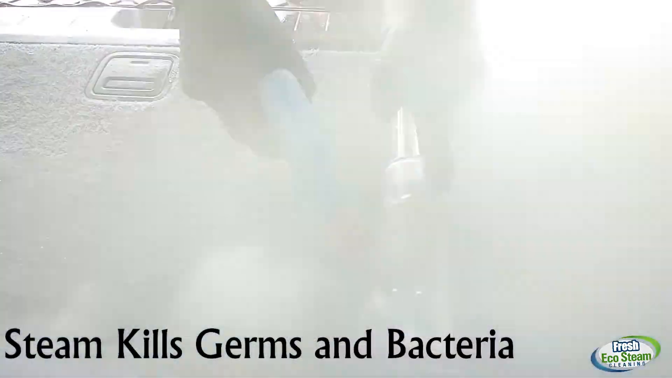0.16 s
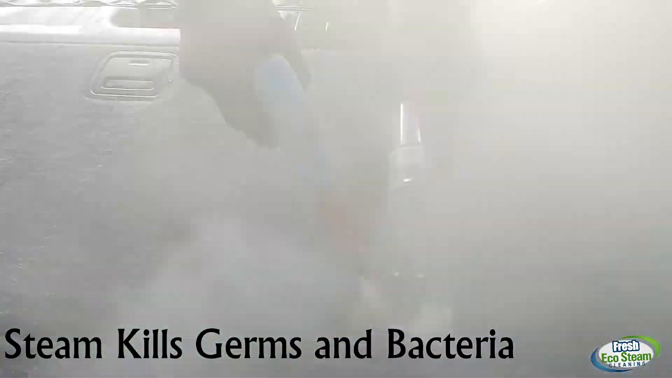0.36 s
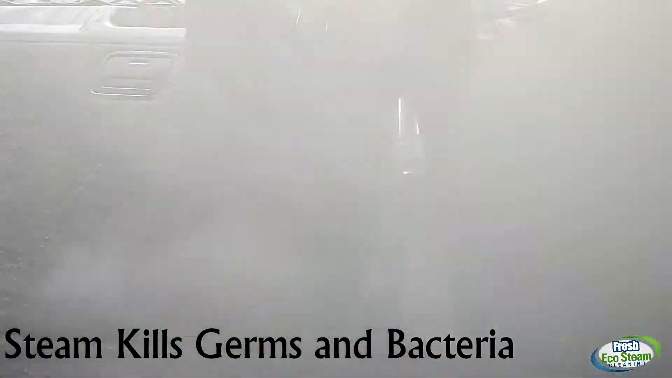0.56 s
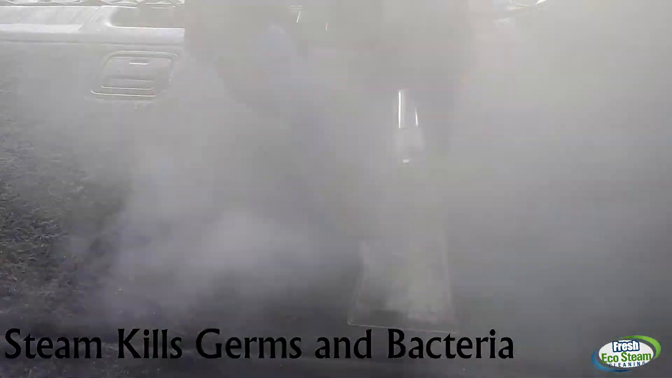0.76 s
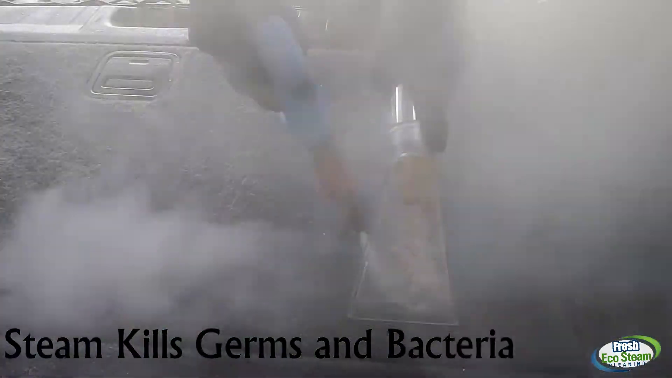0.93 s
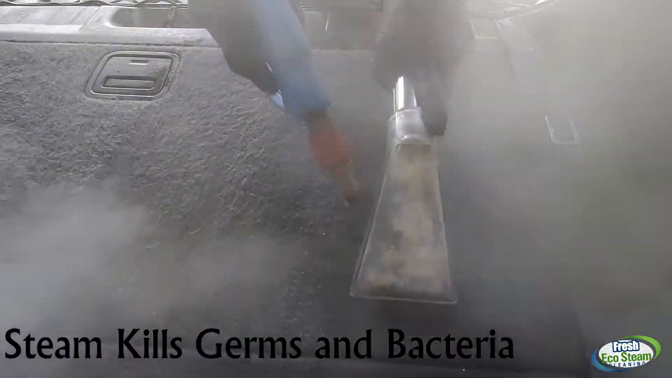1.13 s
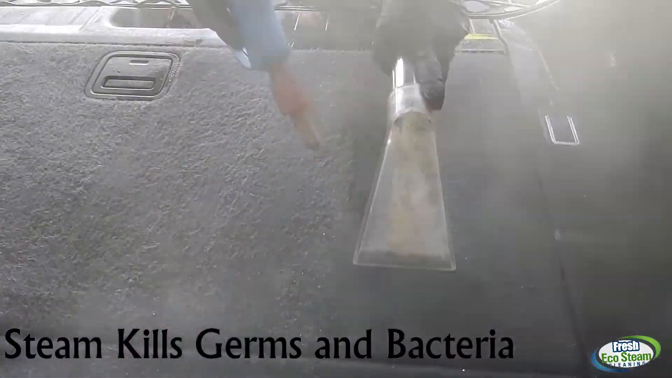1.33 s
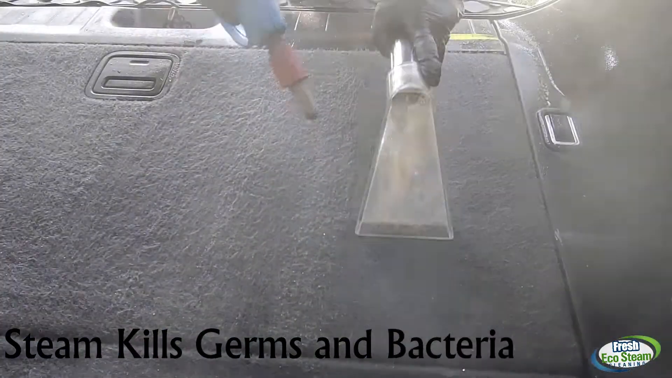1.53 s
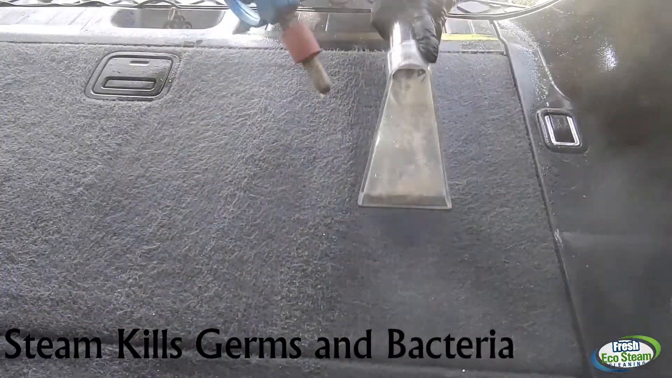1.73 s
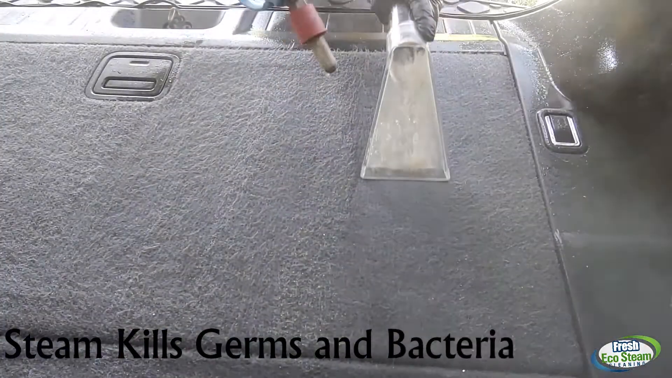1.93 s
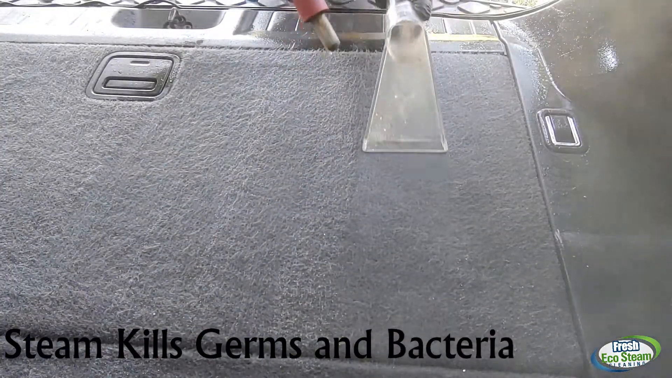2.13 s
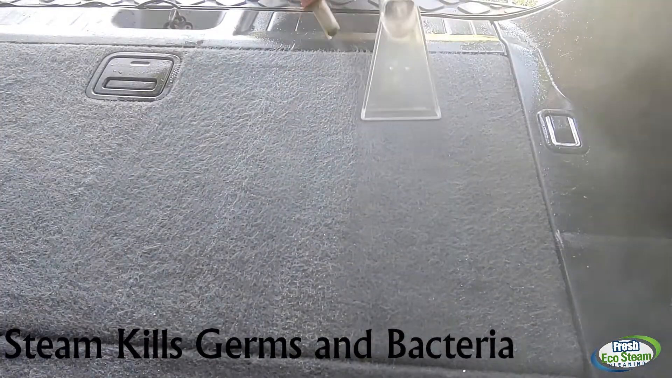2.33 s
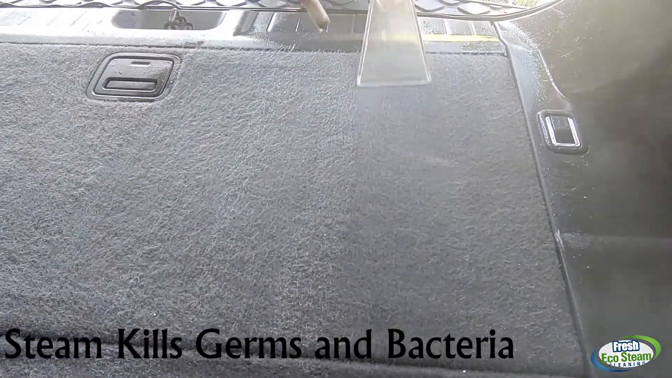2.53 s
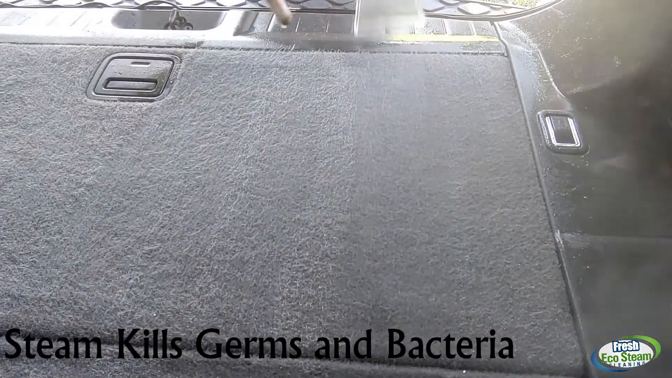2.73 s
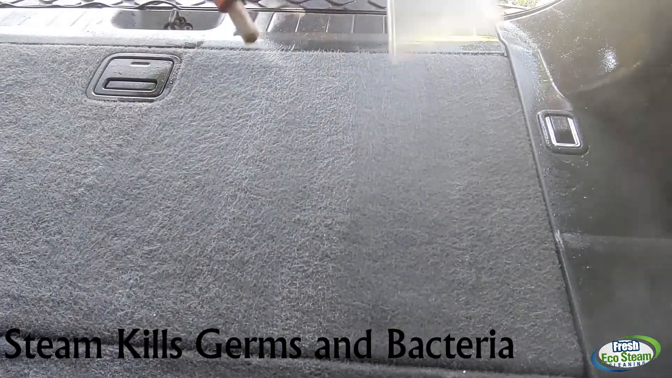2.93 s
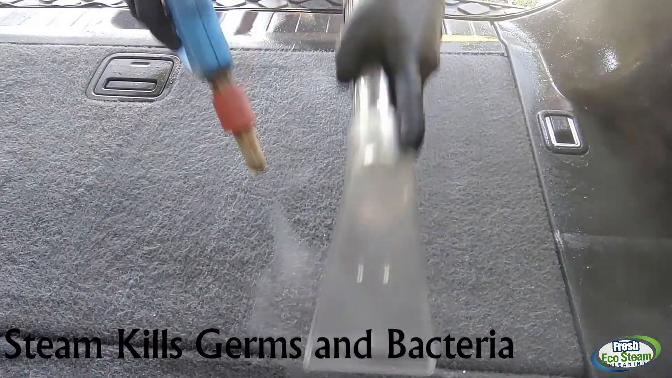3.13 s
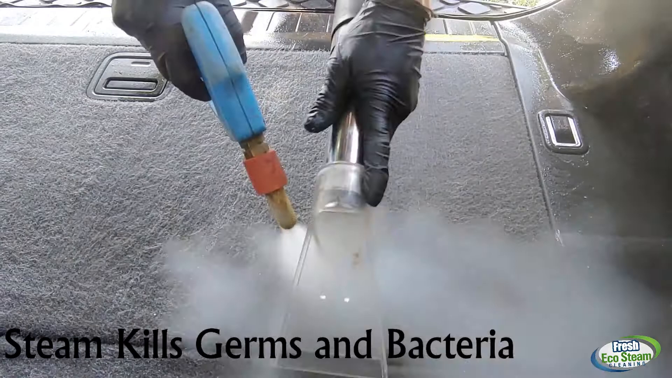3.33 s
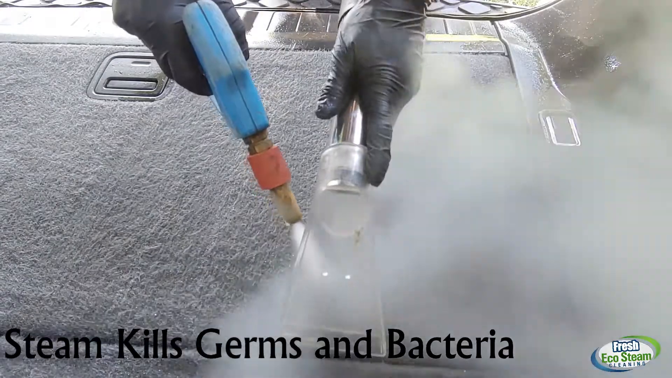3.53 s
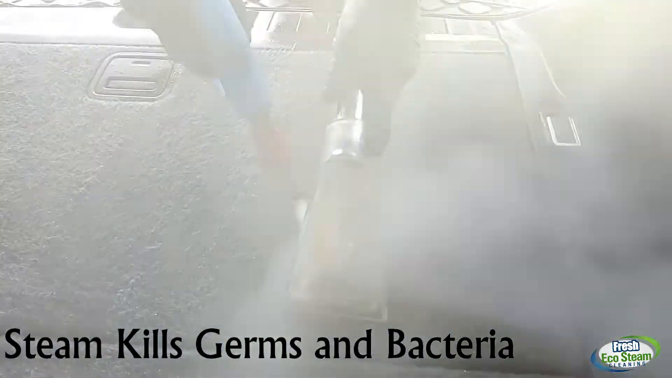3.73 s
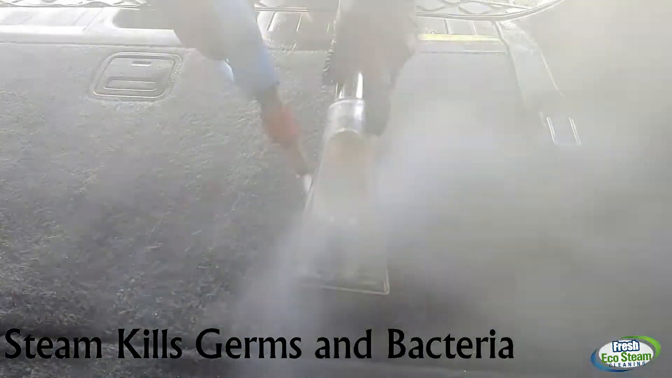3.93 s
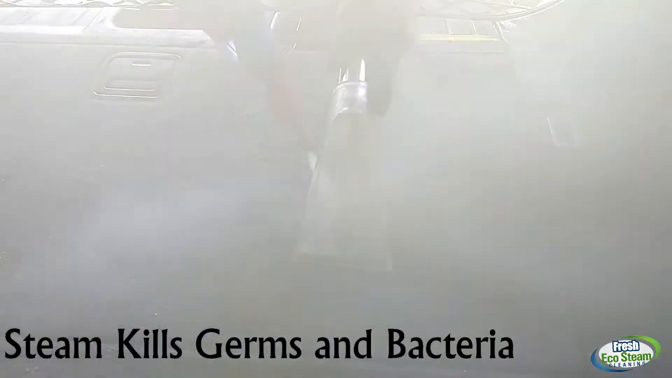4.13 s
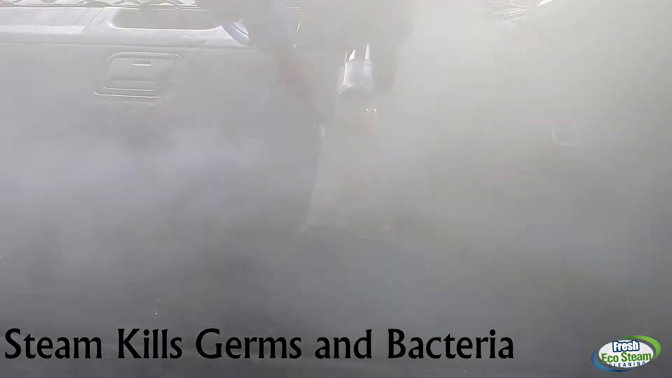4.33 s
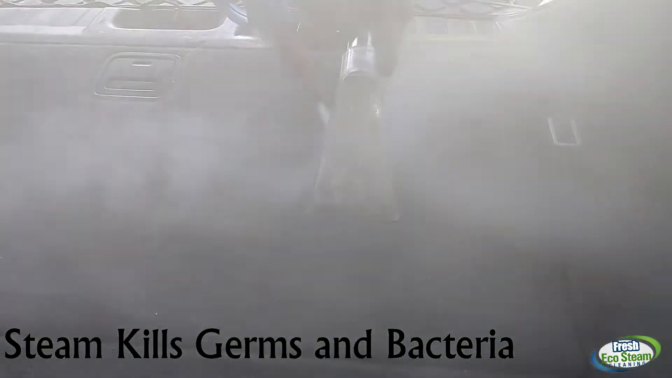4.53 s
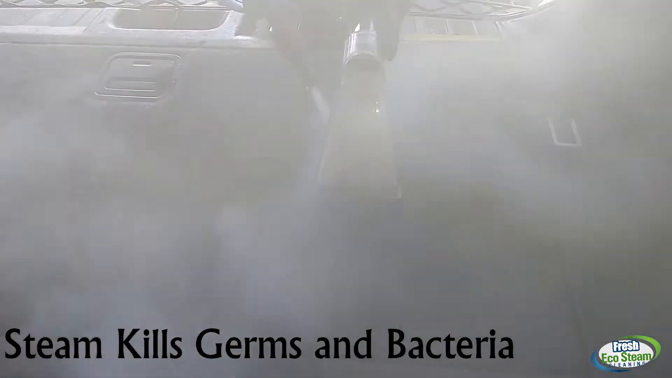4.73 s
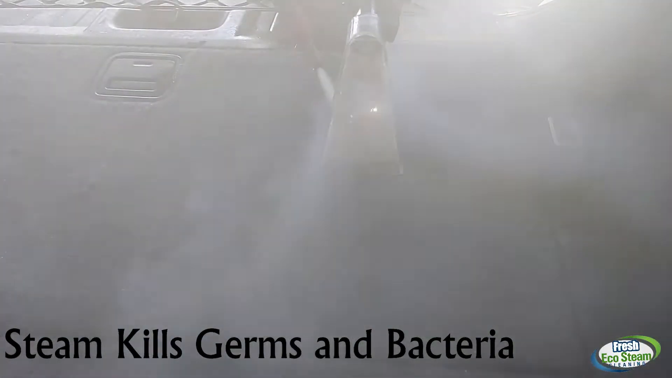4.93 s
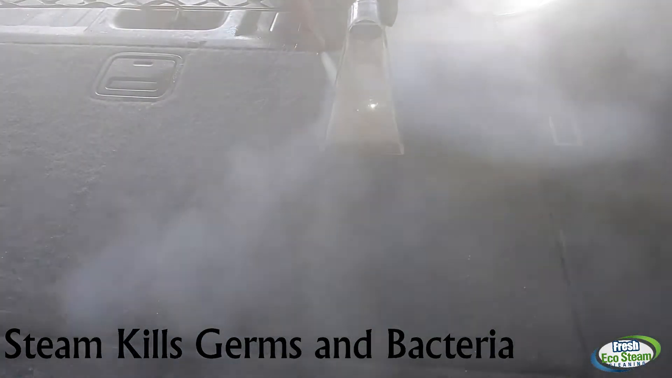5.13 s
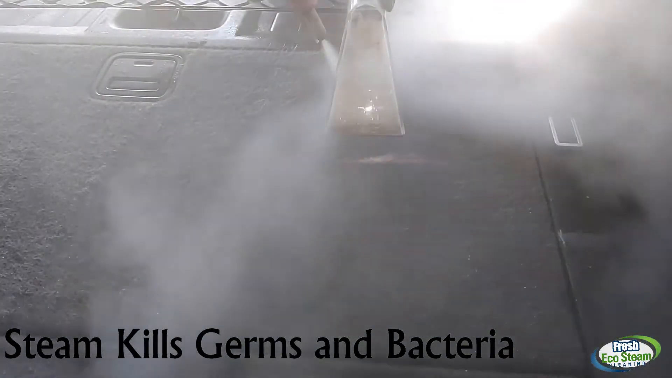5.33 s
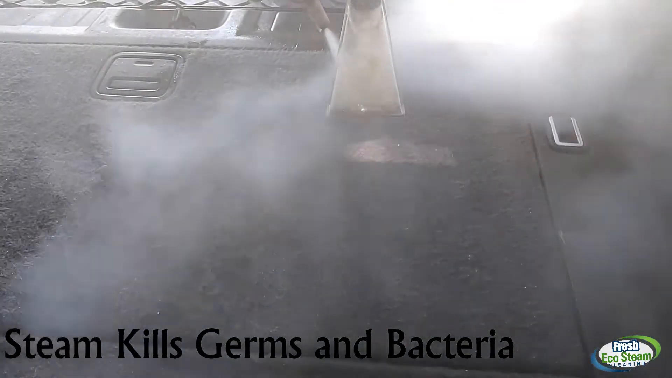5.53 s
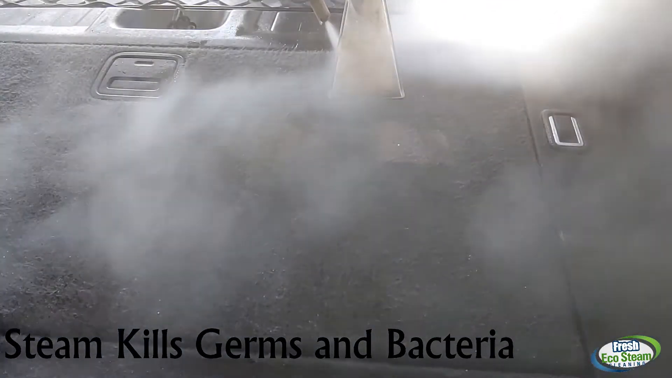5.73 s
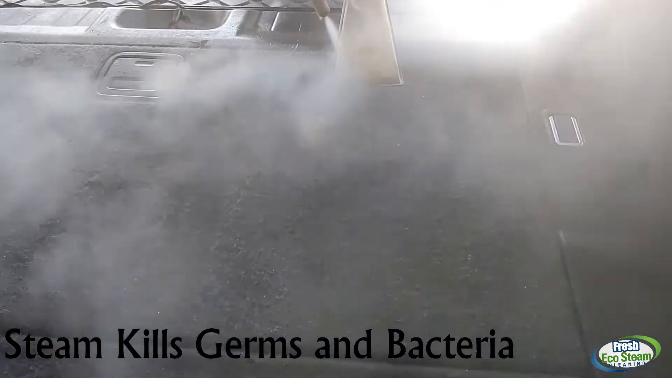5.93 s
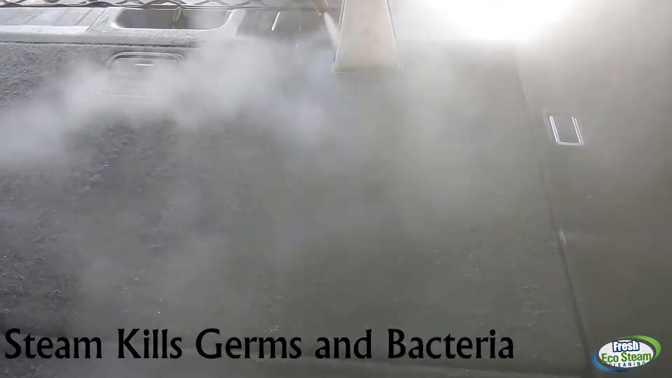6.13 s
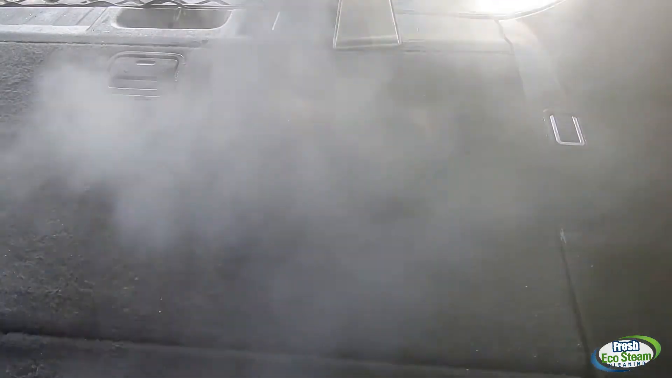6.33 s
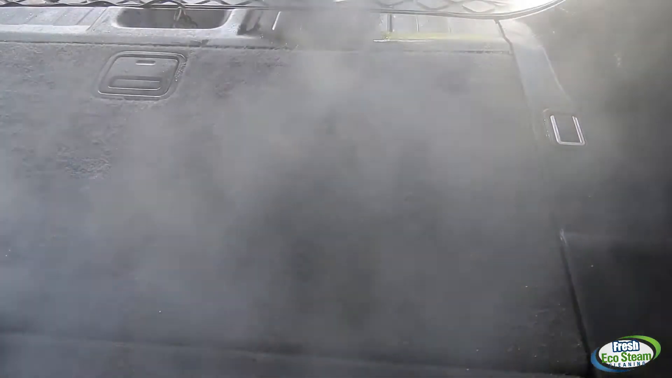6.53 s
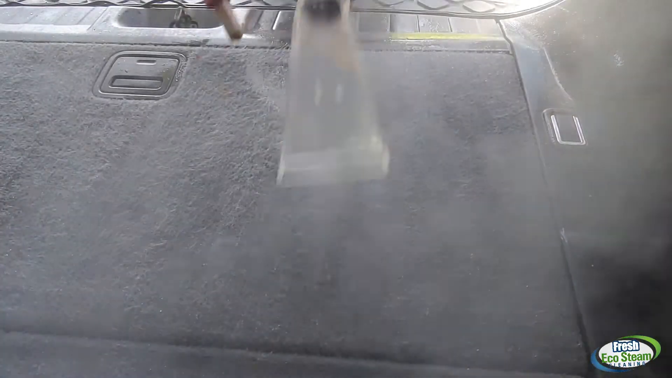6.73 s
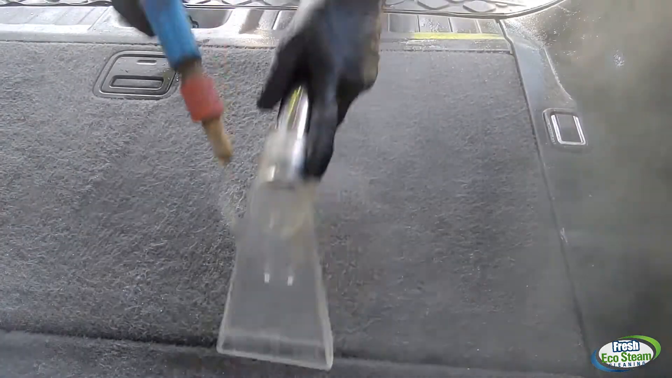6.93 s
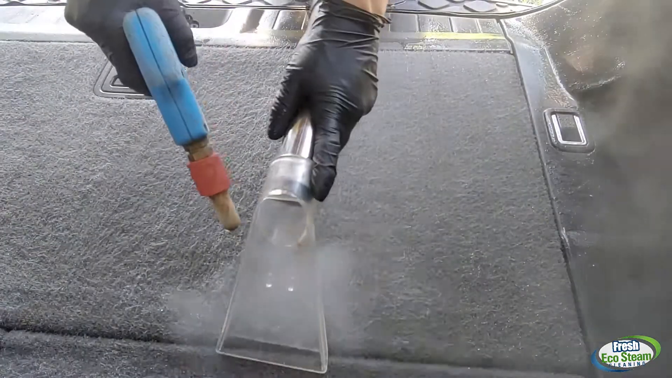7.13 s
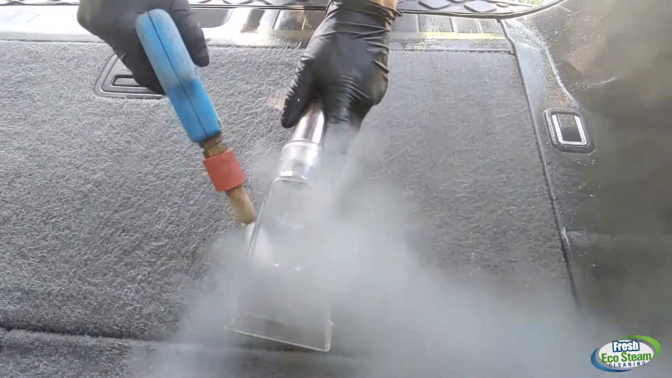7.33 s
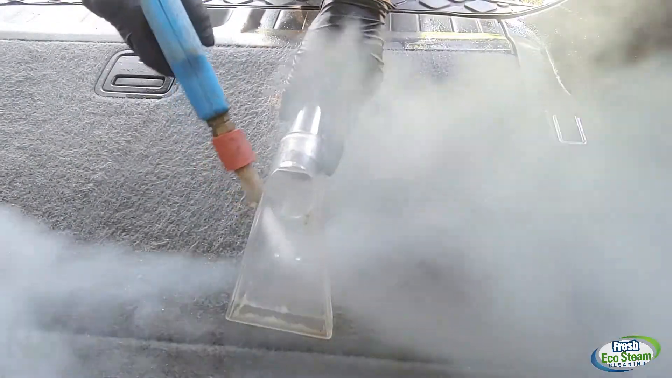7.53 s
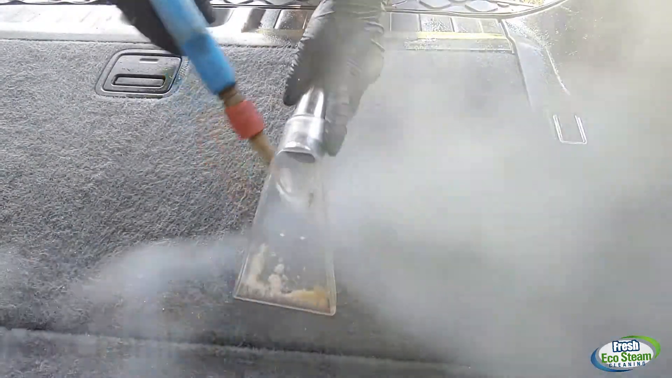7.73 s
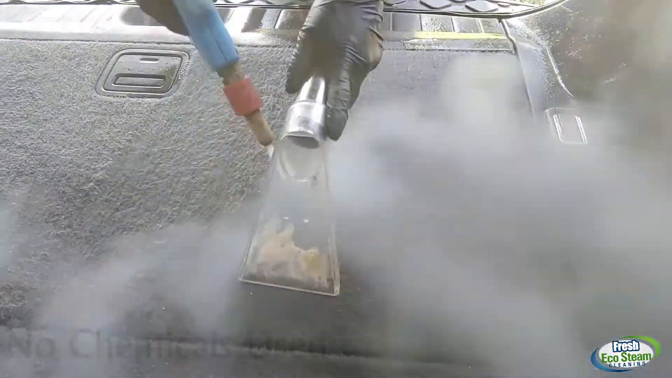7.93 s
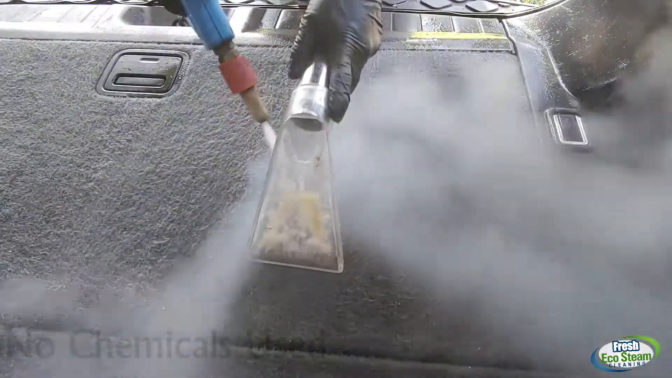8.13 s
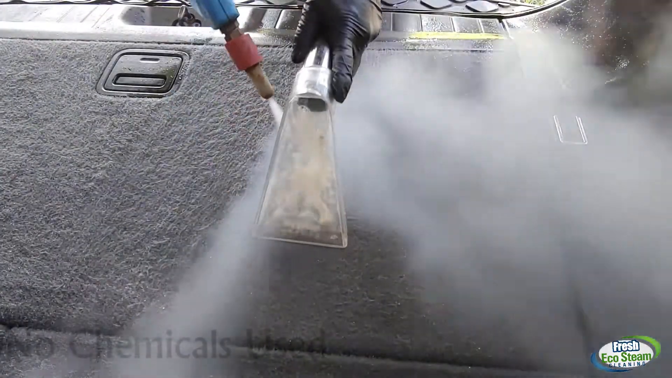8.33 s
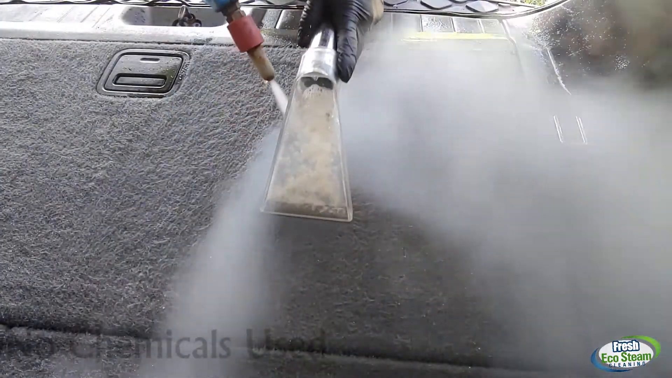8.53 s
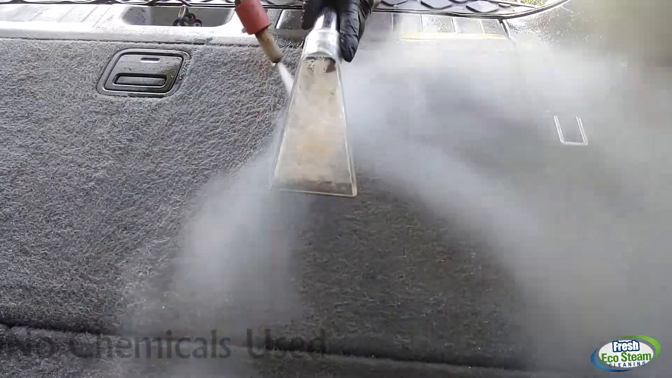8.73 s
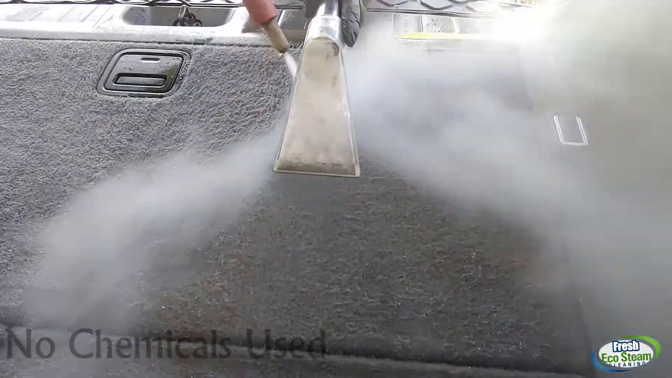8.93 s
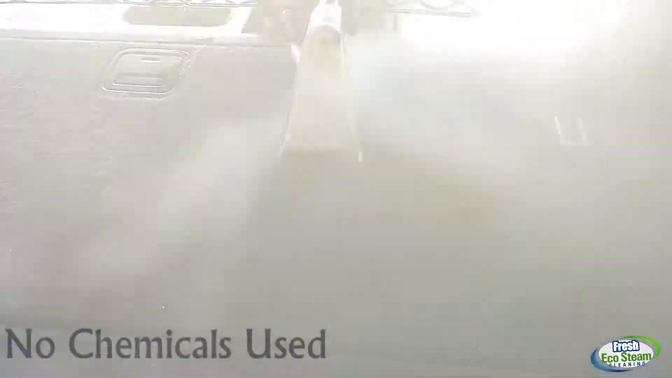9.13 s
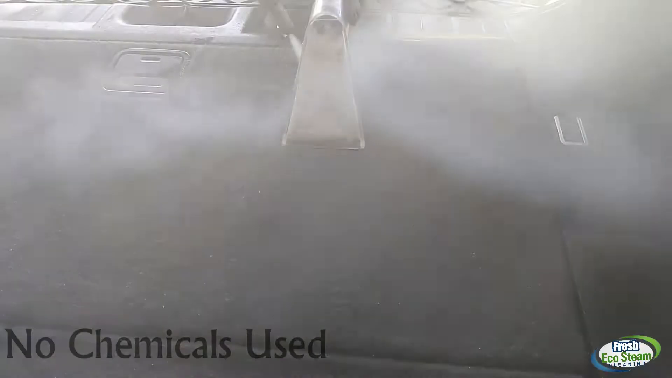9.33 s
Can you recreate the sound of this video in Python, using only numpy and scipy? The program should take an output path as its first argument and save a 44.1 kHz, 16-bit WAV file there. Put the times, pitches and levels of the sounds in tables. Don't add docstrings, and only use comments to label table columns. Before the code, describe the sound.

Close, harsh steam blasts inside a car boot, separated by a fluctuating extractor whine, rushing suction air and one soft thud onto carpet.

```python
import sys
import numpy as np
from scipy import signal
from scipy.fft import rfft, irfft, next_fast_len
from scipy.io import wavfile
from scipy.ndimage import uniform_filter1d, map_coordinates

SR = 44100
rng = np.random.default_rng(int(sys.argv[2]) if len(sys.argv) > 2 else 0)


def unload_audio(sound):
    columns = np.transpose(np.atleast_2d(sound))
    steps = np.round(np.clip(columns, -1, 1) * 32767)
    wavfile.write(sys.argv[1], SR, steps.astype(np.int16))


def volts_from_decibels(level):
    exponent = np.asarray(level, float) / 20
    return 10 ** exponent


N = 413216
T, M = np.arange(N) / SR, next_fast_len(N)
HZ = np.fft.rfftfreq(M, 1 / SR) + 1e-3
G = T[::32]


def along_hz(table, column=1):
    table = np.array(table, float)
    return np.interp(np.log(HZ), np.log(table[:, 0]), table[:, column])


def resonances(peaks, depth):
    floor_db = min(db for _, _, db in peaks)
    return 1 + depth * sum(volts_from_decibels((db - floor_db) / 2) / (1 + (2 * (HZ - hz) / width_hz) ** 2)
                           for hz, width_hz, db in peaks)


def gated(spans, rise_s, fall_s):
    rows = []
    for span in spans:
        before = (span[0][0] - rise_s, -90, span[0][2])
        after = (span[-1][0] + fall_s, -90, span[-1][2])
        rows += [before, *span, after]
    s, db, control = np.transpose(rows)
    return np.interp(G, s, db), np.interp(G, s, control)


def smooth(x, k):
    return uniform_filter1d(uniform_filter1d(x, k), k)


def walk(rate_hz):
    k = int(SR / rate_hz)
    return smooth(np.repeat(rng.standard_normal(N // k + 1), k), k)[:N]


def unit(x):
    return x / np.sqrt(np.mean(x ** 2))


def moving_band(hz, width_hz):
    a, b = smooth(rng.standard_normal((2, N)), max(int(.6 * SR / width_hz), 1))
    turn = 2 * np.pi * np.cumsum(hz) / SR
    return unit(a * np.cos(turn) + b * np.sin(turn))


def airflow(gain, curves_db, centres_hz, surge_db, flicker_db):
    spectrum = rfft(rng.standard_normal(M)) * gain
    order = np.argsort(centres_hz)
    surge = surge_db * (walk(9) + 0.69 * walk(25))
    out = 0
    for k, hz in enumerate(centres_hz):
        mask = np.interp(np.log(HZ), np.log(np.sort(centres_hz)), 1. * (order == k))
        core = spectrum * (np.abs(np.log2(HZ / hz)) < .5)
        scale = M / np.sqrt(2 * np.sum(np.abs(core) ** 2))
        db = np.interp(T, G, curves_db[k]) + surge + flicker_db * walk(14)
        out = out + irfft(spectrum * mask, M)[:N] * scale * volts_from_decibels(db)
    return out


# time in s, pressure in dB, gun drawn away 0-1.
JET_BURSTS = [
    [(0, -19, 0.15), (.06, -17, 0.07), (.25, -17.5, 0), (.42, -17, 0.09), (.57, -17.5, 0),
     (.89, -17.5, 0.17), (.99, -20, 0.39)],
    [(3.292, -16.5, 0.03), (3.39, -16, .05), (3.43, -20, .05), (3.47, -18.5, 0.27), (3.88, -16.5, 0.13),
     (4.6, -17, .45), (5.35, -19.5, 0.86), (5.8, -20, 0.94), (6.26, -20, 0.99)],
    [(7.135, -34, .2), (7.175, -23, 0.07), (7.26, -21.5, 0.22), (7.34, -14.5, 0.13), (7.41, -17.5, 0.43),
     (7.81, -15.5, 0.22), (8.31, -16, 0.21), (8.73, -18.5, 0.81), (9.37, -18.5, 0.97)],
]
# fully open in s, wet sputter 0-1, sputter decay in s, jet core in dB re hiss,
# extra fizz in dB.
TRIGGER_PULLS = [
    (-.1, 0.88, 0.95, -4, 2.5),
    (3.29, 1, 0.45, -3.5, 1.2),
    (7.275, 1.2, 0.16, -5.5, -0.6),
]
# dB re pressure, dB more drawn away, dB more sputtering,
# dB more half open.
JET_LAW = [
    (0, -1, -3.5, 2.5),
    (-8.5, 9, 5.5, 5.5),
    (-23.5, 7.5, 13.5, 10.5),
    (-20, 7.5, 2.5, -1),
]


def jet_layers():
    pressure_db, drawn = gated(JET_BURSTS, rise_s=.04, fall_s=.09)
    pull_ends_s = [span[-1][0] + .5 for span in JET_BURSTS[:-1]]
    s, wet, dies_s, core_db, fizz_db = np.array(TRIGGER_PULLS)[np.searchsorted(pull_ends_s, G)].T
    opened = np.clip(1 + (G - s) / 0.079, 0, 1)
    sputter = wet * opened * np.exp(-np.clip(G - s, 0, None) / dies_s)
    hiss, body, splash, fizz = (pressure_db + base + away * drawn + spit * sputter + shy * (1 - opened)
                                for base, away, spit, shy in JET_LAW)
    core = hiss + core_db + 4.5 * sputter
    spray = sputter * volts_from_decibels(hiss - 18 + 2 * fizz_db)
    return [hiss, body, splash, fizz + fizz_db], core, spray, drawn


# stroke end in s, delays of three echoes in ms.
ECHO_PATHS = [
    (0, 0.41, 1.57, 3.8),
    (1.1, 0.96, 1.6, 3.3),
    (2.499, 0.83, 1.5, 3.2),
    (3.3, 1.09, 2.87, 3.94),
    (4.8, 0.818, 2.55, 3.55),
    (6.3, 0.89, 1.93, 2.5),
    (7.2, 0.726, 1.66, 4.8),
    (8.6, 1.22, 2.64, 3.87),
    (9.37, 1.4, 1.96, 4),
]
ECHO_DB = [-15, -14, -14]


def echoes(x):
    s, *delays_ms = np.transpose(ECHO_PATHS)
    out = x.copy()
    for ms, db in zip(delays_ms, ECHO_DB):
        late = (np.interp(T, s, ms) + 0.068 * walk(3)) * SR / 1000
        out += volts_from_decibels(db) * map_coordinates(x, [np.arange(N) - late], order=1, mode="nearest")
    return out * np.std(x) / np.std(out)


JET_HZ = [4800, 2300, 900, 10000]
# frequency in Hz, density in dB per Hz.
JET_COLOUR = [(250, -42), (450, -28), (560, -19.5), (650, -9.5), (1150, -12.5), (1600, -6), (2200, -4.5),
              (4900, 0.5), (6100, -3), (7300, -12.5), (8500, -22.5), (9500, -18.5), (12000, -26),
              (15700, -37.5)]


def jet():
    layers, core_db, spray, drawn = jet_layers()
    near_hz, far_hz = 5559, 4146
    core_hz = np.interp(T, G, near_hz + (far_hz - near_hz) * drawn)
    core = moving_band(core_hz, width_hz=1500) * volts_from_decibels(np.interp(T, G, core_db) + walk(19))
    droplets = moving_band(np.full(N, 11400.), width_hz=2200) * np.interp(T, G, spray)
    hiss = airflow(volts_from_decibels(along_hz(JET_COLOUR)), layers, JET_HZ, surge_db=0.98, flicker_db=1.05)
    return echoes(core + droplets + hiss)


# time in s, flow in dB, opening 0-1.
WAND_LIFTS = [
    [(2.635, -33, 0.3), (2.685, -21.5, 0.1), (2.727, -20, 0.51), (2.775, -29, 0.66), (2.8, -23, 0.5),
     (3.05, -23, 0.44), (3.175, -25, 0.88), (3.209, -20, 0.48), (3.279, -31, 0.57)],
    [(6.295, -31.5, 0), (6.44, -31.5, 0.67), (6.49, -33.5, 0.36), (6.572, -28, 0.56), (6.846, -29, 0.74),
     (6.944, -32.5, 0.72), (6.976, -30, 0.8), (6.99, -49, 1.1)],
]
# dB re flow, dB more wide open.
WAND_LAW = [
    (-26, 41),
    (-8.5, 2.5),
    (-0.5, -3.5),
]


def wand_layers():
    flow_db, opening = gated(WAND_LIFTS, rise_s=0.037, fall_s=.03)
    return [flow_db + base + wide * opening for base, wide in WAND_LAW]


WAND_HZ = [550, 1450, 4200]
# frequency in Hz, density in dB per Hz.
WAND_COLOUR = [(70, -35), (120, -19), (235, -13.5), (400, -3.5), (660, -3), (1000, 0.5), (1600, 7.5),
               (2200, -2.5), (3100, -2.5), (5500, -7.5), (7000, -15.5), (8200, -29.5), (12000, -30.5),
               (15700, -50)]
# frequency in Hz, width in Hz, level in dB.
NOZZLE = [(375, 45, -8), (670, 180, -3), (1555, 33, -57)]


def wand():
    layers = wand_layers()
    gain = volts_from_decibels(along_hz(WAND_COLOUR)) * resonances(NOZZLE, depth=0.42)
    rush = airflow(gain, layers, WAND_HZ, surge_db=0.56, flicker_db=3.0)
    starts_s = [lift[0][0] for lift in WAND_LIFTS]
    age_s = np.min([np.where(G > s - .5, G - s, np.inf) for s in starts_s], axis=0)
    lasts_s, dies_db_per_s = 0.38, 200
    whistle_db = layers[2] - 5 - dies_db_per_s * np.clip(age_s - lasts_s, 0, 1)
    whistle_db = np.interp(T, G, whistle_db) + 1.9 * walk(12)
    whistle = moving_band(1594 * (1 + 0.011 * walk(10)), width_hz=80)
    return echoes(rush) + whistle * volts_from_decibels(whistle_db)


# start in s, end in s, first Hz, last Hz, level in dB.
POCKETS = [(0, 1.02, 2520, 2630, -29.5), (0, 1.02, 3640, 3530, -29), (.4, 1.02, 4750, 4750, -31),
           (3, 4.4, 3630, 3640, -34), (4, 4.1, 2080, 2060, -33.5), (3.5, 4.6, 4750, 4800, -28),
           (4.4, 5.6, 3450, 3570, -30.5), (4.6, 6.28, 3950, 4020, -31.5), (4.5, 5.9, 1600, 1600, -33),
           (5, 6.28, 2470, 2770, -28.5), (5.4, 6.28, 2200, 2175, -28), (0, 1.05, 5750, 5500, -25),
           (8, 8.9, 4590, 4530, -34), (8.3, 9.4, 3395, 3547, -32), (7.5, 9.4, 2180, 2208, -41),
           (8.5, 9.4, 1575, 1600, -32.5), (3, 3.03, 3200, 3080, -27), (3, 3.06, 5500, 5800, -31),
           (3, 3.25, 4500, 4200, -34.5), (2.5, 3.22, 724, 690, -30), (6.5, 6.75, 4530, 5000, -37.5),
           (6.74, 6.9, 3600, 3440, -42), (6.7, 6.9, 4420, 4200, -37), (6.72, 6.96, 1330, 1150, -40)]


def pockets():
    out = np.zeros(N)
    noise = rng.standard_normal((2, 2 * SR))
    flicker_db = 4 * walk(8.9)
    for row, (start, end, hz, later_hz, db) in enumerate(POCKETS):
        on = np.arange(int(max(start, 0) * SR), min(int(end * SR), N))
        width_hz = 75 + 0.013 * hz
        a, b = smooth(np.roll(noise, 3001 * row)[:, :len(on)], int(.6 * SR / width_hz))
        turn = 2 * np.pi * np.cumsum(np.linspace(hz, later_hz, len(on))) / SR
        ring = unit(a * np.cos(turn) + b * np.sin(turn)) * signal.windows.tukey(len(on), .5)
        out[on] += volts_from_decibels(db + np.roll(flicker_db, 9001 * row)[on]) * ring
    return out


# time in s, peak in dB.
THUD = [
    (6.975, -15),
]
# frequency in Hz, level in dB, t60 in s.
THUD_MODES = [(90, 7, 0.055), (209, 4, 0.059), (420, 1, 0.033), (790, 8, 0.067)]


def thud():
    out = 0
    for s, peak_db in THUD:
        age = np.clip(T - s, 0, None)
        ring = sum(volts_from_decibels(db - 60 * age / t60) * np.sin(2 * np.pi * hz * age) for hz, db, t60 in THUD_MODES)
        out = out + volts_from_decibels(peak_db) * ring * np.minimum(age / 0.0052, 1) / 2
    return out


# time in s, shaft in Hz, air level in dB, whine in dB.
MOTOR = [(0, 519, -33, -53), (1.12, 524.2, -36.5, -56), (1.3, 527.5, -35.5, -45.5),
         (1.6, 531.5, -33, -40.5), (1.95, 529, -31, -35), (2.2, 521, -28.5, -36), (2.65, 517, -29.5, -38),
         (2.95, 497, -31, -35.5), (3.3, 480, -35, -37), (3.6, 492, -36.5, -48), (4.7, 519, -39.5, -52),
         (6.3, 524, -33.5, -39.5), (6.55, 514, -40, -39), (6.8, 486, -36.5, -38), (7.05, 479.6, -35.5, -34),
         (7.3, 477, -30, -35), (7.6, 493, -42, -56.5), (9.37, 527, -35.5, -43.5)]
# frequency in Hz, density in dB per Hz.
MOTOR_COLOUR = [(120, -51), (200, -33), (365, -5), (471, -17), (516, -13), (586, -9), (1030, -8.5),
                (1310, -13.5), (1510, -11.5), (1920, -6), (2140, -5), (2970, -7), (6380, -8), (7940, -29.5),
                (15600, -45)]
# frequency in Hz, width in Hz, level in dB.
HOUSING = [(1490, 94, 7), (2200, 48, 5), (2523, 115, 0), (3640, 57, -6), (3880, 44, -5), (4750, 18, -17)]
# multiple of shaft speed, level in dB.
SHAFT_ORDERS = [(1, -3), (2, -12), (3, -17)]
BLADE_ORDERS = [(9, -2), (12, 0)]
# frequency in Hz, width in Hz, level in dB re motor air.
PUMP_LINES = [(2180, 49, -27), (9650, 200, -36)]


def motor():
    s, *columns = np.transpose(MOTOR)
    hz, air_db, shaft_db = (np.interp(T, s, c) for c in columns)
    lost_hz = 528 - hz
    blade_db = -51.5 + 1.6 * (air_db + 36) - 1.27 * lost_hz
    turn = 2 * np.pi * np.cumsum(hz * (1 + 0.00086 * walk(30.3))) / SR

    def tones(orders):
        out = 0
        for k, db in orders:
            level_db = db + 2 * walk(12) - (1 < k < 4) * 0.1833 * lost_hz
            out = out + volts_from_decibels(level_db) * np.sqrt(2) * np.sin(round(k) * turn)
        return out

    gain = volts_from_decibels(along_hz(MOTOR_COLOUR)) * resonances(HOUSING, depth=0.79)
    air = unit(irfft(rfft(rng.standard_normal(M)) * gain, M)[:N])
    pump = sum(volts_from_decibels(db) * moving_band(np.full(N, f), width_hz) for f, width_hz, db in PUMP_LINES)
    whine = volts_from_decibels(shaft_db) * tones(SHAFT_ORDERS) + volts_from_decibels(blade_db) * tones(BLADE_ORDERS)
    return volts_from_decibels(air_db + walk(13)) * (air + pump) + whine


RUMBLE_HZ = [70, 220]
# frequency in Hz, density in dB per Hz.
RUMBLE_COLOUR = [(12, -42), (20, -8), (40, -12), (59, 3), (77, 2.5), (97, -3), (183, 0), (226, -3.5),
                 (304, -6.5), (356, -7), (450, 2.5), (580, -40), (990, -120)]
# dB re motor level, dB re wand roar, dB re carpet splash.
RUMBLE_LAW = [
    (-18.5, -28, -34.5),
    (-24.5, -16, -15.5),
]
# time in s, drone in dB, hum in dB.
BUMPS = [(2.58, -38, -60), (2.68, -38, -43), (2.89, -45, -31.5), (3.05, -40, -28.5), (3.26, -32.5, -37),
         (3.35, -38, -36), (3.43, -42, -50), (6.34, -52, -60), (6.42, -56, -45), (6.57, -63, -34.5),
         (6.78, -53, -60), (6.86, -43, -45), (6.94, -46, -55), (6.99, -34, -49), (7.1, -47, -56),
         (7.3, -40, -57)]


def rumble():
    motor_db = np.interp(G, *np.transpose(MOTOR)[[0, 2]])
    shakers_db = motor_db, wand_layers()[0], jet_layers()[0][2]
    layers = []
    for k, law in enumerate(RUMBLE_LAW):
        knocks_db = np.max([row[k + 1] - 216 * np.abs(G - row[0]) for row in BUMPS], axis=0)
        shaken = sum(volts_from_decibels(db + gap_db) for db, gap_db in zip(shakers_db, law))
        layers.append(20 * np.log10(volts_from_decibels(knocks_db) + shaken))
    return airflow(volts_from_decibels(along_hz(RUMBLE_COLOUR)), layers, RUMBLE_HZ, surge_db=0.0, flicker_db=-0.15)


def wall_tail():
    age = np.arange(4096) / SR
    tail = rng.standard_normal(len(age)) * volts_from_decibels(-60 * age / 0.17)
    return rfft(tail / np.linalg.norm(tail), M)


# frequency in Hz, width in Hz, level in dB.
BOOT = [(1185, 245, 1.5), (1593, 45, -13), (2130, 19, -3), (2664, 17, 11), (3920, 21, 2), (4800, 2950, -12)]
# frequency in Hz, wall tail share in dB.
WALLS = [(500, -30), (1500, -10), (6000, -8), (15000, -9)]
# time in s, left minus right in dB.
PAN = [(0.0, -6), (0.21, -6.5), (0.96, -2.0), (2.66, -4), (3.21, -4), (3.47, -1.0), (4.88, -1), (6.5, -3.5),
       (7.38, -4.0), (7.67, -1.0), (8.46, -1.0), (9.37, -2.5)]
# frequency in Hz, extra left minus right in dB, unrelated share in dB.
PORTS = [(40, 2, -11), (120, 0, -17), (250, 3, -17), (590, 3, -14.5), (1500, -1.5, -38.5),
         (2980, -0.5, -38), (6800, 0, -23), (7100, -4.5, -18), (9200, 5.5, -35), (10350, 0.5, -11),
         (11400, 8, -3), (12600, 9, -4), (15500, 2, -4)]


def scene():
    sources = jet() + wand() + pockets() + motor() + rumble() + thud()
    dry = rfft(sources, M) * resonances(BOOT, depth=0.31) / 1.175
    turn = 1.323 * T
    here, there = (irfft(dry * wall_tail() * volts_from_decibels(along_hz(WALLS)), M)[:N] for _ in range(2))
    dry = dry + rfft(np.cos(turn) * here + np.sin(turn) * there, M)
    scatter = wall_tail()
    apart = scatter / np.abs(scatter) * volts_from_decibels(along_hz(PORTS, 2))
    pan_db = np.interp(T, *np.transpose(PAN))
    ports = []
    for side in (1, -1):
        port = dry * (1 + side * apart) * volts_from_decibels(side * along_hz(PORTS) / 2)
        ports.append(irfft(port, M)[:N] * volts_from_decibels(side * pan_db / 2))
    return np.array(ports)


def band_limit(x):
    return signal.sosfilt(signal.butter(12, 15730, fs=SR, output="sos"), x)


# frequency in Hz, gain in dB.
MIC_SHELF = [(11900, 0), (12500, -7.5), (15500, -5)]


def record(dry):
    clipped = np.clip(dry, -.95, .95)
    heard = irfft(rfft(clipped, M) * volts_from_decibels(along_hz(MIC_SHELF)), M)[:, :N]
    return band_limit(heard)


dry = scene()
out = record(dry)
unload_audio(out)
```